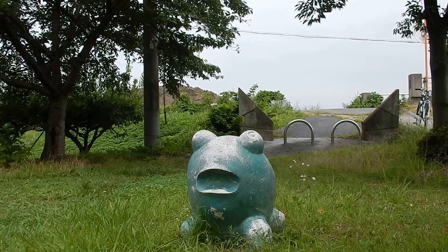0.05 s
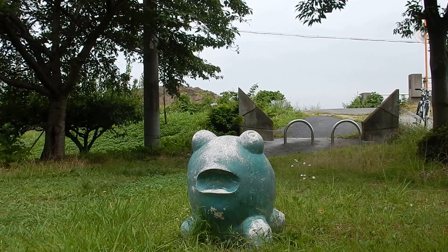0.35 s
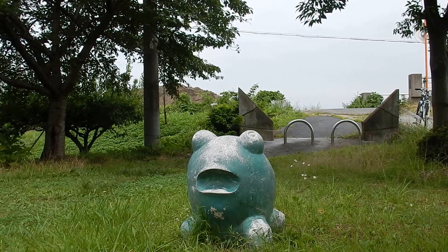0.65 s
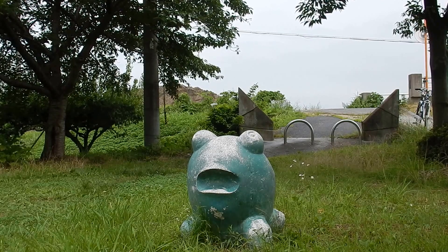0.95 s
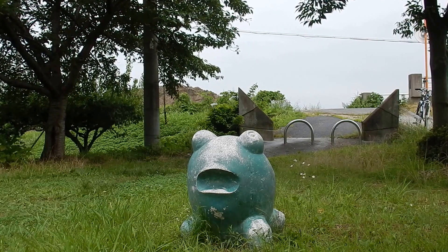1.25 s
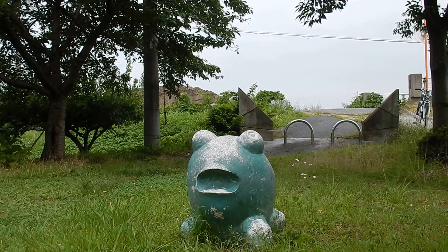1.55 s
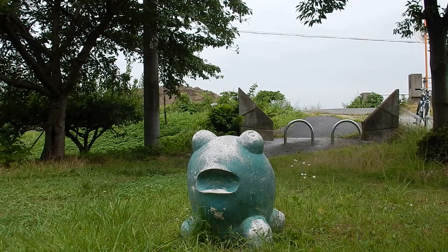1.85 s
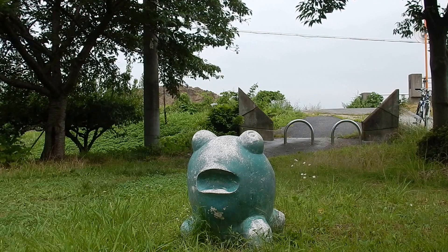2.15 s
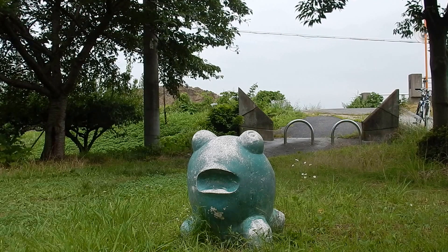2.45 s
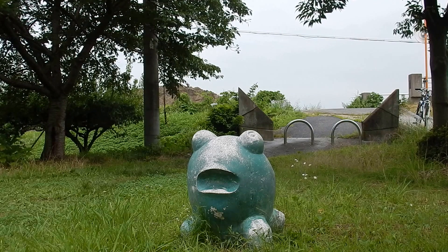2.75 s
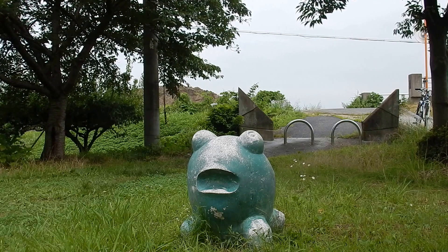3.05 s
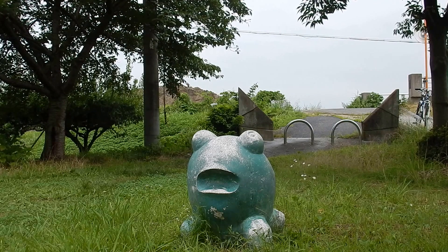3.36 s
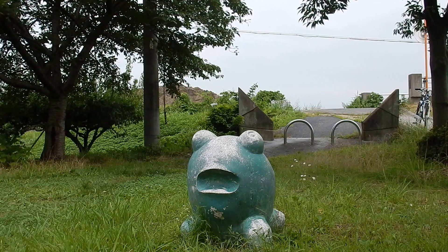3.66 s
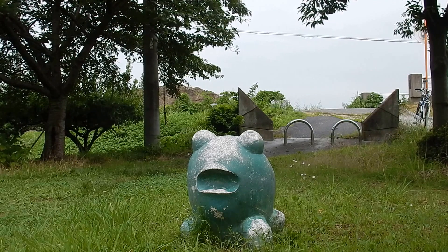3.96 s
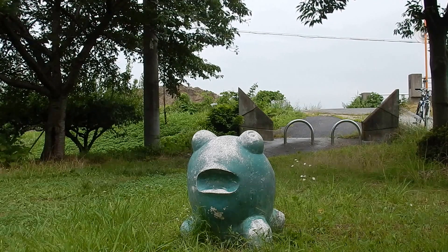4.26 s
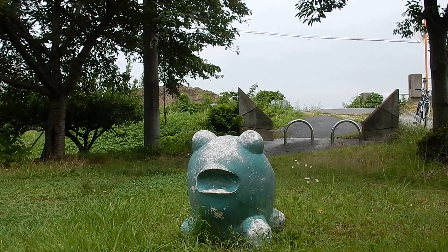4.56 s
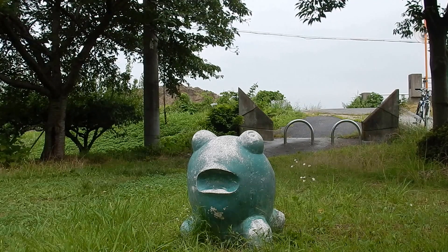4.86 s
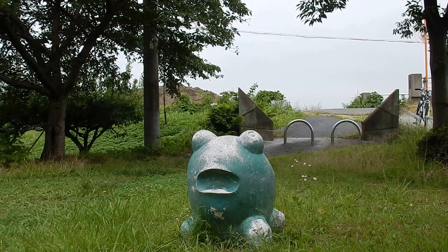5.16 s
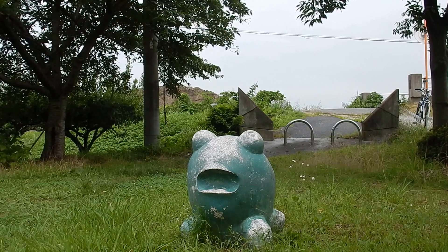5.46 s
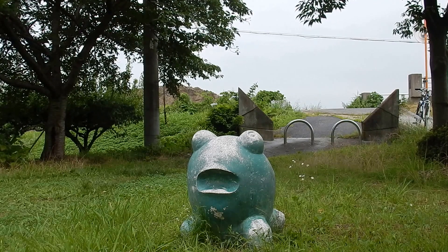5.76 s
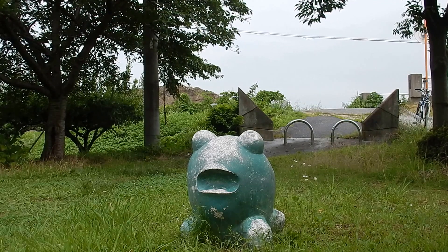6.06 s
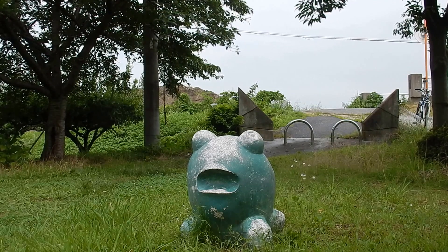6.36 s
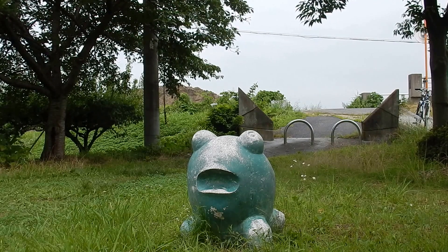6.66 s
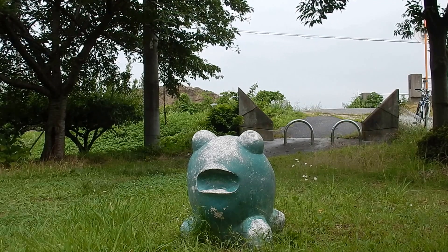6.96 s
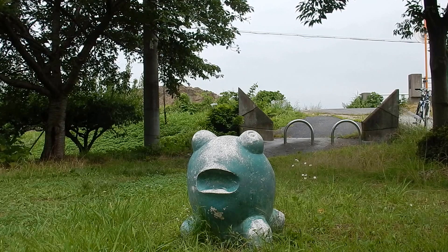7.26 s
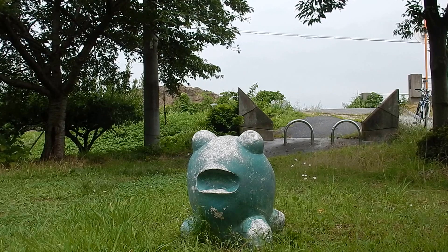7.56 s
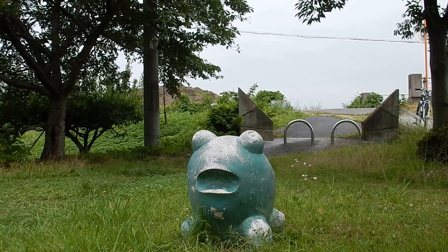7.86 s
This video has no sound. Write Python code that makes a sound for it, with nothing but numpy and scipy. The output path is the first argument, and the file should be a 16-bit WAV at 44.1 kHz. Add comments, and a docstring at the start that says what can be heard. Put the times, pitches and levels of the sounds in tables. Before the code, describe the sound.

In a park, a distant chorus of cicadas sizzles steadily over a faint rumble and hum of traffic. One nearby cicada sings about five pulses a second, each a dark rasp followed by a bright buzz, growing stronger as it warms up. Midway, a few soft thumps sound close to the microphone. Near the end, two vehicles pass faintly in the distance.

```python
"""A summer din in a park, most likely cicadas. From the start a far chorus sizzles over distant traffic that
rumbles, hums and passes. A near singer warms up to five pulses a second, at first overlapped by a duller
neighbour. Its body retunes with every pulse: each pulse is a low, dark rasp, then a bright syllable, and the
trees scatter both. Midway a few soft thumps sound near the microphone; late on, two more vehicles pass far off."""
import sys
import numpy as np
from scipy import signal
from scipy.fft import rfft, irfft, next_fast_len
from scipy.io import wavfile
from scipy.ndimage import map_coordinates

SR = 44100
rng = np.random.default_rng(int(sys.argv[2]) if len(sys.argv) > 2 else 0)


def put_to_file(sound):
    """Save the sound as 16-bit audio at rate SR, in the file named by the first command-line argument."""
    columns = np.atleast_2d(sound).T  # one column per channel
    safe = np.clip(columns, -1, 1)
    whole_steps = np.round(safe * 32767)
    wavfile.write(sys.argv[1], SR, whole_steps.astype(np.int16))


N = 353682

# stereo image of the diffuse layers: f/Hz, left-right likeness (1 is mono)
STEREO_LIKENESS = [(40, .6), (130, .82), (1200, .95), (3000, .88), (4800, .78), (6500, .55), (9000, .2),
                   (12000, -.2)]
# tone curves of the far chorus, the tyre rumble and the open air's rush: f/Hz, level/dB
CHORUS_EQ = [(1300, -65), (1950, -19.5), (2250, -4), (2650, -4), (3100, -1), (3480, 0.5), (3850, -1),
             (4700, 1), (5600, -1.5), (6450, -8.5), (7700, -6.5), (9300, -6), (11200, -21.5),
             (15500, -37.5)]
ROAD_EQ = [(22, -28), (35, -17), (52, -1), (90, 0.5), (125, -2.5), (190, 0), (280, -3.5), (420, -7.5),
           (700, -16.5), (1500, -41)]
AIR_EQ = [(200, -6), (550, 0), (1000, -1), (1800, 0), (3000, -4), (15000, -43)]
# engine tones of the steady far hum and of a passing vehicle: f/Hz, level/dB
HUM_TONES = [(188, -8), (343, -8), (412, -14), (620, -19), (695, -16), (1117, -15)]
DRONE_TONES = [(94, -2.5), (186, 1)]
# far pass-bys: nearest t/s, length/s, engine level/dB, tyre rush level/dB
PASS_BYS = [(0.5, 1.5, -65, -53.5), (2.0, 0.7, -50.5, -56), (6.75, 1.07, -49.5, -53),
            (7.75, 0.95, -49, -50.5)]
# faint far tones that come and go: t/s, length/s, f/Hz, level/dB
FAR_WHINES = [(1.68, 0.35, 830, -56), (7.75, 0.3, 620, -58)]
# the neighbour's out-of-step syllables: t/s, level/dB
NEIGHBOUR_SYLLABLES = [(0.083, -33.5), (0.357, -31), (0.546, -33.5), (0.738, -30), (0.929, -30.5),
                       (1.144, -30.5), (1.48, -32)]
# the near singer's quickening pace, even between points: t/s, syllables sung so far
SINGER_PACE = [(0.165, 0), (1.308, 5), (2.705, 12), (4.614, 22), (4.97, 24), (7.007, 35), (7.35, 37),
               (7.924, 40)]
# its effort, the fader that ring and rasp follow: t/s, level/dB
SINGER_EFFORT = [(0.15, -30.5), (1.1, -30.5), (1.55, -26.5), (4.4, -26), (5.8, -28), (8.0, -27.5)]
# tone curves of one tymbal click, as dark rasp, mid ring and bright top: f/Hz, level/dB
RASP_EQ = [(1700, -40.5), (2100, -11), (2300, 5), (2650, -8), (3100, -1.5), (3450, 7.5), (3800, -6),
           (4500, -4), (6000, -25), (9000, -62)]
RING_EQ = [(3300, -41), (4100, -12), (4500, -0.5), (4720, -5), (4950, 1), (5600, -3.5), (5850, -5),
           (6100, -6.5), (6500, -23.5), (7500, -44)]
TREBLE_EQ = [(5500, -31), (6600, -6), (7400, -2.5), (8300, -1.5), (9100, 2), (9800, -2), (10500, -6),
             (11200, -16), (13000, -21.5), (15500, -56)]
# sharp resonances of the hollow abdomen: f/Hz, level/dB, lead on the syllable's centre/s
ABDOMEN_MODES = [(4515, -7, .022), (4597, -1, .014), (4870, -6, .002), (4970, -3, -.002), (6019, -8, .001)]
# soft knocks near the microphone: t/s, f/Hz, level/dB, t60/s
KNOCKS = [(2.43, 72, -36, 0.11), (3.215, 80, -37, .12), (3.315, 189, -29, 0.11), (3.876, 86, -36, 0.066),
          (4.305, 230, -26, 0.073)]

TIME = np.arange(N) / SR


def amp(db):
    """Decibels to gain."""
    return 10 ** (np.asarray(db) / 20)


def unit(x):
    """Scale to rms 1."""
    return x / np.sqrt(np.mean(x ** 2) + 1e-20)


def pan(left_db):
    """Stereo gains with the left channel left_db above the right."""
    return amp([[left_db / 2], [-left_db / 2]])


def along(points, hz):
    """Read a curve of (Hz, value) points on a log frequency axis."""
    f, v = np.transpose(points)
    return np.interp(np.log(hz + 1), np.log(f), v)


def eq_gain(eq, hz):
    """Gain of a tone curve that rolls off steeply beyond its ends."""
    return amp(along([(eq[0][0] / 2, -120), *eq, (eq[-1][0] * 2, -120)], hz))


def wobble(rate):
    """A smooth random modulator, rate knots a second."""
    return map_coordinates(rng.standard_normal(int(N * rate / SR) + 4), [TIME * rate])


def filtered(x, response):
    """Filter x by a function of frequency."""
    size = next_fast_len(N + SR // 2)
    return irfft(rfft(x, size) * response(np.fft.rfftfreq(size, 1 / SR)), size)[..., :N]


def through(x, impulse):
    """Convolve x with an impulse response."""
    return signal.fftconvolve(np.atleast_2d(x), np.atleast_2d(impulse), axes=1)[:, :N]


def spread(pair, eq):
    """Two unrelated signals become a coloured stereo bed of rms 1."""
    width = lambda hz: np.arccos(np.clip(along(STEREO_LIKENESS, hz), -1, 1)) / 2
    mid, side = filtered(pair, lambda hz: eq_gain(eq, hz) * [np.cos(width(hz)), np.sin(width(hz))])
    return unit(np.array([mid + side, mid - side]))


def swells(centres, lengths, levels_db):
    """Bell-shaped envelopes; a length is the time spent above half power."""
    t = np.arange(0, N, 32) / SR
    bells = np.exp(-np.log(2) * (2 * (t[:, None] - centres) / lengths) ** 2)
    return np.sqrt(np.interp(TIME, t, bells @ amp(levels_db) ** 2))


def tymbals(rate_hz, jitter_s, limp_db, scatter_db):
    """A click train: the two tymbals take turns, and limp_db makes one a little stronger."""
    at = np.flatnonzero(np.diff(np.floor(np.cumsum(rate_hz) / SR)))
    late, force = rng.standard_normal((len(at), 2)).T
    at = np.clip(at + np.round(late * jitter_s * SR).astype(int), 0, N - 1)
    return np.bincount(at, amp(scatter_db * force + limp_db * (-1) ** np.arange(len(at))), N)


def rib_bursts(clicks, t60):
    """A tymbal's ribs buckle in a short ragged burst after every click; one burst for each ear."""
    age = np.arange(SR // 20) / SR
    power = through(clicks ** 2, amp(-60 * age / t60) ** 2)
    return np.sqrt(np.abs(power)) * rng.standard_normal((2, N))


def far_chorus(count=12, pulse_db=3, settled_db=-29, ease_db=1.5, ease_s=1.0):
    """Far singers, each at its own click rate and tempo, blur into a sizzle that eases down a little."""
    voices = np.zeros(N)
    for _ in range(count):
        pitch, tempo, start = rng.uniform(-1, 1, 3)
        beat = np.sin(2 * np.pi * ((4.6 + tempo) * TIME + start))
        clicks = tymbals(370 + 45 * pitch + 12 * beat, jitter_s=.0003, limp_db=0.6, scatter_db=2.5)
        voices += clicks * amp(pulse_db * beat)
    sizzle = spread(rib_bursts(voices, t60=0.02), CHORUS_EQ)
    level_db = settled_db + ease_db * np.exp(-TIME / ease_s) + 0.2 * wobble(18)
    return sizzle * amp(level_db) * pan(left_db=1.5)


def engine_tones(tones, waver_hz, ear_phase):
    """Wavering engine notes; shifting paths bring them to the two ears out of step."""
    out = 0
    for hz, db in tones:
        phase = 2 * np.pi * np.cumsum(hz + waver_hz * wobble(15)) / SR
        arrival = ear_phase * wobble(6) * np.array([[1], [-1]])
        out = out + amp(db + 1.7 * wobble(2.55)) * np.sin(phase + arrival)
    return out


def traffic(road_db=-46.5, hum_db=-50, air_db=-48.5, dip_at=4.49, dip_depth=0.6):
    """A bed of tyre rumble, engine hum, faint whines and open air; each pass-by adds drone and rush."""
    nearest, length, engine_db, rush_db = np.transpose(PASS_BYS)
    rumble = spread(rng.standard_normal((2, N)), ROAD_EQ) * amp(road_db + 0.59 * wobble(14))
    hum = engine_tones(HUM_TONES, waver_hz=3.91, ear_phase=0.19) * amp(hum_db)
    drone = engine_tones(DRONE_TONES, waver_hz=7.08, ear_phase=0.14) * swells(nearest, length, engine_db)
    lull = 1 - dip_depth * swells([dip_at], 0.1, [0])  # the low end ducks briefly
    rush_gain = np.hypot(amp(air_db), swells(nearest, length, rush_db))
    rush = rush_gain * spread(rng.standard_normal((2, N)), AIR_EQ)
    whines = sum(engine_tones([(hz, 0)], waver_hz=2.9, ear_phase=0.2) * swells([at], span, [db])
                 for at, span, hz, db in FAR_WHINES)
    return (rumble + hum + drone) * lull + rush + whines


def song(first_length_s=0.045, growth=0.0028, warm_treble_db=-28.5, warm_up_db=3.5, warm_up_s=0.81,
         uneven_db=0.37, uneven_length=0.043, neighbour_s=0.055, neighbour_treble_db=-5.5):
    """Cue list for singer and neighbour: centre t/s, length/s, ring level/dB, treble level/dB."""
    times, sung = np.transpose(SINGER_PACE)
    centres = np.interp(np.arange(sung[-1] + 1), sung, times)
    force, stretch = rng.standard_normal((len(centres), 2)).T
    # the singer's syllables lengthen and brighten as it warms up
    length = (first_length_s + growth * centres) * np.exp(uneven_length * stretch)
    ring_db = np.interp(centres, *np.transpose(SINGER_EFFORT)) + uneven_db * force
    treble_db = warm_treble_db - warm_up_db * np.exp(-centres / warm_up_s) + uneven_db * force
    neighbour = [(at, neighbour_s, db, db + neighbour_treble_db) for at, db in NEIGHBOUR_SYLLABLES]
    return np.transpose(sorted([*zip(centres, length, ring_db, treble_db), *neighbour]))


def voiced(clicks, eq, size=2048):
    """Give every click a sharp attack and the ring of a tone curve (minimum phase), at rms 1."""
    cepstrum = irfft(np.log(eq_gain(eq, np.fft.rfftfreq(size, 1 / SR))))
    cepstrum[1:size // 2] *= 2
    cepstrum[size // 2 + 1:] = 0
    return unit(through(clicks, irfft(np.exp(rfft(cepstrum)))))


def trees(x, wet_db, t60, left_db, size=8192):
    """Direct sound plus scatter from moving leaves: a short reverb whose tail is new in every block."""
    age = np.arange(size) / SR
    blocks = signal.stft(x[0], window="cosine", nperseg=size, nfft=2 * size)[2].T
    tails = rng.standard_normal((len(blocks), 2, size)) * amp(-60 * age / t60)
    wet = np.zeros((2, N + 4 * size))
    for k, piece in enumerate(irfft(blocks[:, None] * rfft(tails, 2 * size))):
        wet[:, k * size // 2:][:, :2 * size] += piece
    wet = unit(wet[:, size // 2:][:, :N]) * x.std() * amp(wet_db)
    return (x + wet) / np.hypot(1, amp(wet_db)) * pan(left_db)


def dark_rasps(syllables, lead_s=0.091, rasp_s=0.058, rate_hz=388, trim_db=-6,
               mode_hz=3453, mode_s=0.09, mode_db=-4.5):
    """Ahead of each syllable the body is tuned lower and the tymbals run faster; one sharp mode sings."""
    centres, _, ring_db, _ = syllables
    clicks = tymbals(rate_hz + 9 * wobble(14), jitter_s=.00022, limp_db=0, scatter_db=1.3)
    rasp = voiced(clicks, RASP_EQ) * swells(centres - lead_s, rasp_s, ring_db + trim_db)
    tone = np.sin(2 * np.pi * mode_hz * TIME + np.pi / 2 * wobble(110))
    body = tone * swells(centres - lead_s, mode_s, ring_db + trim_db + mode_db)
    return trees(rasp + body, wet_db=-6.5, t60=0.077, left_db=3.0)


def bright_syllables(syllables, rate_hz=359, sag_hz_per_s=420, treble_lag_s=0.01,
                     click_db=-1, body_db=-4.0, snap_db=-2, burst_db=-4.5):
    """The click rate sags through each syllable; the ring climbs mode by mode, the treble peaks last."""
    centres, length, ring_db, treble_db = syllables
    nearest = np.searchsorted((centres[1:] + centres[:-1]) / 2, TIME)
    click_hz = rate_hz - sag_hz_per_s * (TIME - centres[nearest]) + 4 * wobble(7)
    clicks = tymbals(click_hz, jitter_s=.00007, limp_db=-0.3, scatter_db=0.5)
    ring = voiced(clicks, RING_EQ) * swells(centres - .002, length, ring_db + click_db)
    # the top layer: a clean snap, which the trees scatter, and a ragged burst
    snap = amp(snap_db) * trees(voiced(clicks, TREBLE_EQ), wet_db=17.0, t60=0.042, left_db=-0.5)
    burst = amp(burst_db) * spread(rib_bursts(clicks, t60=0.046), TREBLE_EQ)
    treble = (snap + burst) * swells(centres + treble_lag_s, length * 1.1, treble_db)
    # the clicks keep the abdomen's modes sounding, played here as sines with a wandering phase
    body = 0
    for hz, db, lead in ABDOMEN_MODES:
        tone = np.sin(2 * np.pi * hz * TIME + np.pi / 3 * wobble(75))
        body += tone * swells(centres - lead, length, ring_db + db + body_db)
    return (body + treble) * pan(left_db=3) + trees(ring, wet_db=-0.5, t60=0.062, left_db=3.5)


def thumps(attack_s=0.0044, puff_db=-9, overtone_ratio=1.62, overtone_db=-9, trim_db=3.5):
    """Soft knocks: a damped low mode, a weaker one above it and a puff of rumble."""
    out = np.zeros((2, N))
    puff = amp(puff_db) * spread(rng.standard_normal((2, N)), ROAD_EQ)
    for at, hz, db, t60 in KNOCKS:
        age = np.maximum(TIME - at, 0)
        phase = 2 * np.pi * hz * age
        modes = np.sin(phase) + amp(overtone_db) * np.sin(overtone_ratio * phase)
        envelope = amp(db + trim_db - 60 * age / t60) * (1 - np.exp(-age / attack_s))
        out += envelope * (modes + puff)
    return out


def scene():
    """The full mix, as heard from the lawn."""
    syllables = song()
    return far_chorus() + traffic() + dark_rasps(syllables) + bright_syllables(syllables) + thumps()


def record(dry, top_hz=15700):
    """The microphone's colour: one full and one partial narrow notch, then a hard high cut."""
    notch = lambda f, hz, width: (hz * hz - f * f) / (hz * hz - f * f + 1j * f * width)
    notches = lambda f: notch(f, hz=2506, width=67) * (0.28 + 0.68 * notch(f, hz=3980, width=97))
    return filtered(filtered(dry, notches), lambda f: f < top_hz)


dry = scene()
out = record(dry)
put_to_file(out)
```